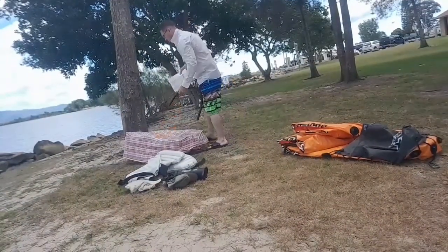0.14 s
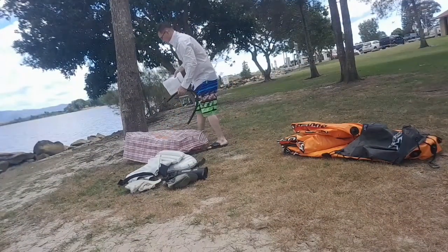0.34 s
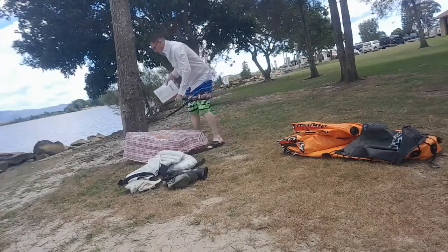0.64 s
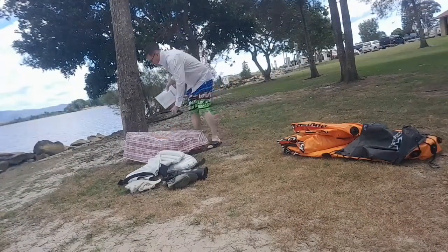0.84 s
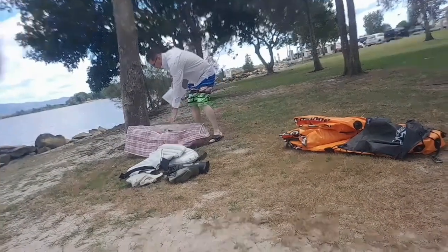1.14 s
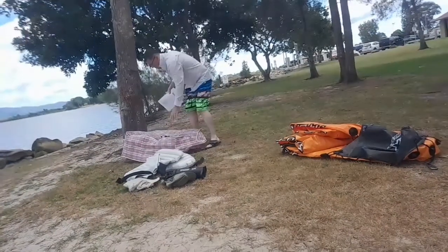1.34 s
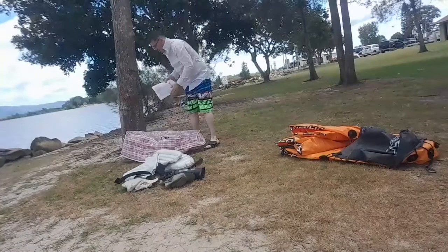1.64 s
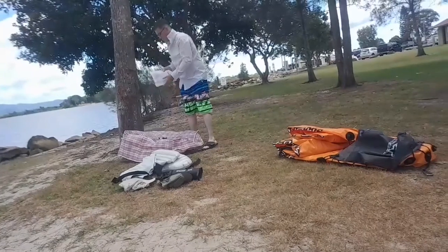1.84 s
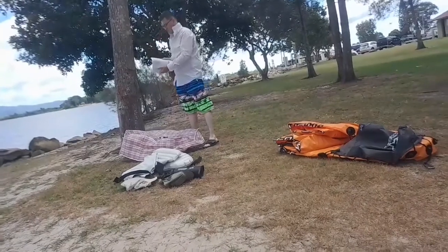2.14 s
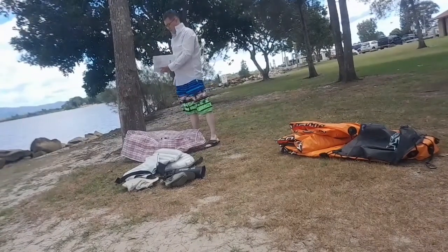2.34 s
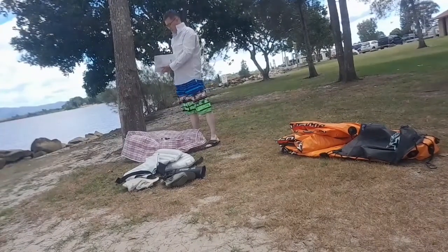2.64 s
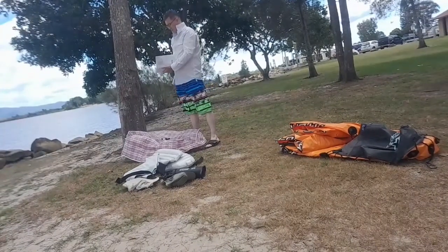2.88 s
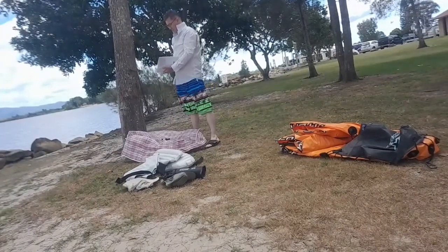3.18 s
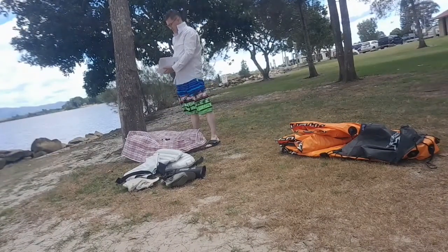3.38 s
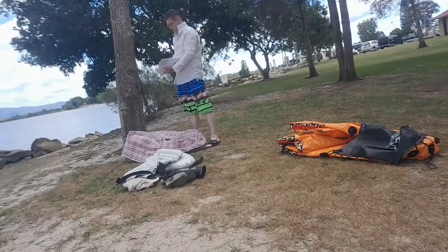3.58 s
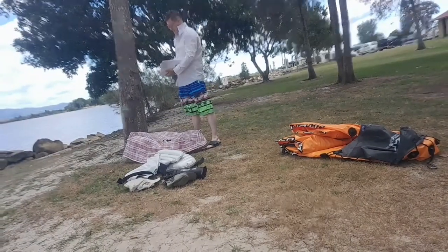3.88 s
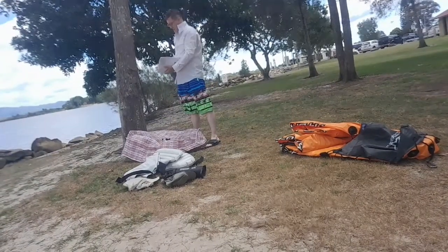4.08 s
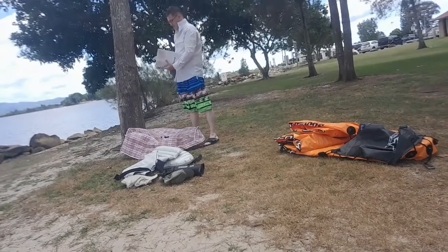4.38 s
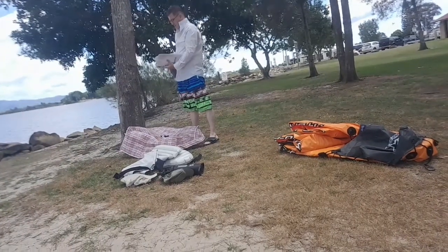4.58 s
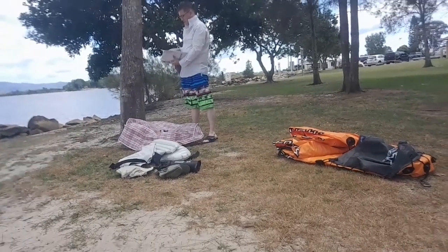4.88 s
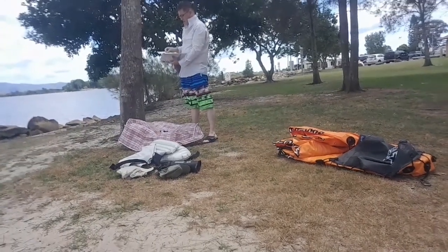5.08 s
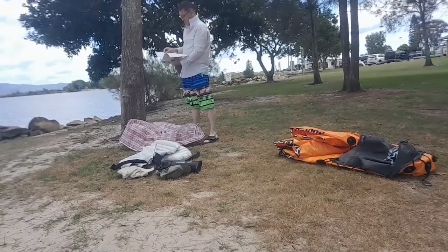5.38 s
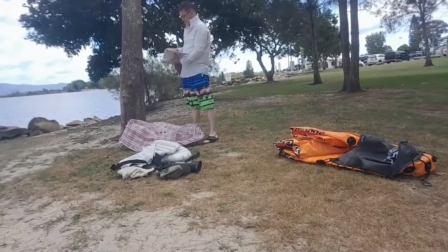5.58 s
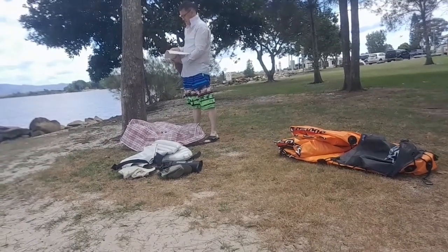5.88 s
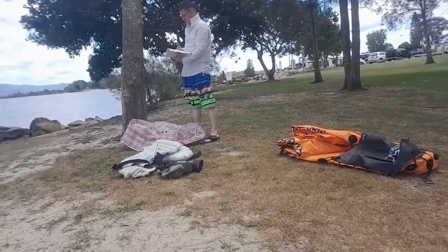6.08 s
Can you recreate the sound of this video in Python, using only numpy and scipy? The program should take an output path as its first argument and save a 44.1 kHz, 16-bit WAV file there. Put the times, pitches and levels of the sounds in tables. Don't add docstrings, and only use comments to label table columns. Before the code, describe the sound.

A quiet open-air park with faint breeze, distant traffic hum and slight microphone hiss. A bird at left gives very short upward whistles every half second or so, with soft echoes from trunks and leaves. From 0 to 1 s there are only weak rubs and tiny knocks. At 1.1 s a finger lands with a loud plastic knock and drags in a harsh, squeaky, ringing scrape, peaking with a low thump near 1.24 s and lifting off by 1.3 s. From 1.5 to 2.35 s come scattered dry ticks, taps and small knocks, sharpest at 1.8 s. It then calms, the bird clear, with faint dry rubbing around 3.7 s. A very loud, clipped knock hits at 3.91 s with rubbing after it, a heavy bump at 4.73 s, lighter taps from 5.05 s, and a hard snapping cluster at 5.53 to 5.65 s. Breeze and traffic, slightly stronger, close the scene.

```python
import sys
import numpy as np
from scipy import signal
from scipy.io import wavfile
from scipy.ndimage import uniform_filter1d

SR = 44100
rng = np.random.default_rng(int(sys.argv[2]) if len(sys.argv) > 2 else 0)


def generate_wav(signal):
    frames = np.transpose(np.atleast_2d(signal))
    scaled = np.clip(frames, -1, 1) * 32767
    pcm = np.round(scaled).astype(np.int16)
    wavfile.write(sys.argv[1], SR, pcm)


def gain_from_db(level_db):
    decades = np.asarray(level_db, float) / 20
    return 10 ** decades


N = 274417

# f/Hz, level/dB
SHELL_RINGS = [(230, -3.5), (430, -8.5), (600, -9.5), (700, -7.5), (900, -10), (1050, -4.5), (1300, -6.5)]


def evened(x):
    return x / np.sqrt(np.mean(x ** 2) + 1e-20)


def read(points, hz):
    f, value = np.transpose(points)
    return np.interp(np.log(hz + 1), np.log(f + 1), value)


def add(mix, s, sound):
    sound = sound[:, max(-round(s * SR), 0):]
    part = mix[:, max(round(s * SR), 0):][:, :sound.shape[1]]
    part += sound[:, :part.shape[1]]


def sides(db):
    return gain_from_db(db * np.array([[.5], [-.5]]))


def resonate(x, hz, width):
    r = np.exp(-np.pi * width / SR)
    return signal.lfilter([1 - r * r, 0, r * r - 1], [2, -4 * r * np.cos(2 * np.pi * hz / SR), 2 * r * r], x)


def sharp_resonate(x, hz, width):
    return resonate(resonate(x, hz, width), hz, width)


def band(x, low_hz, high_hz):
    return signal.sosfilt(signal.butter(3, [low_hz, high_hz], "bandpass", fs=SR, output="sos"), x)


def lowpass(x, hz):
    return signal.sosfilt(signal.butter(2, hz, fs=SR, output="sos"), x)


def noise(spectrum, size, patchy_db, flicker_db, same=None):
    # f/Hz, likeness (1 is identical)
    likeness = [(60, .85), (300, .8), (640, .75), (1400, .35), (3100, 0), (6800, .3), (11000, .85)]
    frames, hz = 4 * N // size + 5, np.fft.rfftfreq(size, 1 / SR)
    a, b, c, d, patches = rng.standard_normal((frames, len(hz), 5)).T
    flicker = evened(uniform_filter1d(patches[0], size=3))
    patches = uniform_filter1d(uniform_filter1d(patches, size=6, axis=0), size=8, axis=1)
    same = read(likeness, hz) if same is None else same + 0 * hz
    same = same[:, None]
    left, other = a + 1j * b, c + 1j * d
    z = np.array([left, same * left + np.sqrt(1 - same ** 2) * other])
    z *= gain_from_db(read(spectrum, hz)[:, None] + patchy_db * evened(patches) + flicker_db * flicker)
    return evened(signal.istft(z, nperseg=size, noverlap=3 * size // 4)[1][:, :N])


def around():
    # t/s, breeze/dB, far traffic/dB
    park = [(0, -47, -50), (0.2, -69, -61.5), (0.55, -62, -55), (0.7, -58, -59), (0.88, -61, -56),
            (1.299, -47.5, -66.5), (1.46, -63.5, -68), (1.9, -52, -66), (2.5, -61.5, -59),
            (2.7, -62, -57.5), (3.28, -57.5, -57.5), (3.45, -57, -61.5), (4.309, -59, -53.5),
            (4.621, -42.5, -49), (5.103, -48, -52), (5.45, -53, -48.5), (5.85, -52, -49.5),
            (6.22, -50.5, -48.5)]
    # start/s, hold/s, pressure/dB, dryness/dB (hiss against rub)
    strokes = [(0, 0.024, -50.5, -8), (0.07, 0.13, -62, -3.5), (0.423, 0.066, -58, -1.5),
               (0.67, 0.15, -58, -8), (1.075, 0.026, -43.5, -0.5), (1.32, 0.02, -55.5, -4),
               (1.493, 0.71, -62.5, -2.5), (1.575, 0.035, -47, -4), (1.829, 0.024, -49.5, -9),
               (1.976, 0.014, -54.5, -5.5), (2.24, 0.04, -45.5, -3.5), (2.3, 0.11, -58.5, -0.5),
               (2.61, 0.17, -64, -9), (3.015, 0.27, -63, 6.5), (3.599, 0.036, -56.5, 5),
               (3.641, 0.03, -52.5, 1.5), (3.704, 0.24, -46, 1), (3.922, 0.054, -34, -7),
               (4.008, 0.025, -43, -6.5), (4.07, 0.035, -38.5, -7.5), (4.147, 0.13, -45.5, -9),
               (4.226, 0.023, -46, -7.5), (4.42, 0.082, -70, 9.5), (4.74, 0.045, -35.5, -11.5),
               (4.792, 0.016, -39.5, -12.5), (4.864, 0.043, -58, 4), (5.061, 0.015, -44, -11),
               (5.139, 0.012, -37, -6), (5.268, 0.21, -59, -0.5), (5.525, 0.02, -39, -9.5),
               (5.563, 0.005, -42, -10.5), (5.584, .008, -29.5, -13), (5.585, 0.011, -32, -0.5),
               (5.615, 0.016, -43, -8), (5.644, 0.0072, -36, -6), (5.661, 0.018, -43, -7.5)]
    # f/Hz, density/dB
    breeze_colour = [(12, -68.5), (27, -35), (45, -2.5), (70, 3), (178, -11), (250, -20), (320, -44),
                     (550, -120)]
    hum_colour = [(110, -54), (180, -12.5), (334, -2.5), (478, -2), (617, -9), (900, -14), (1400, -20.5),
                  (2400, -71.5)]
    rub_colour = [(410, -45), (700, -20), (1140, -3.5), (1650, -14.5), (2450, -13), (3800, -21.5),
                  (4940, -42), (8360, -120)]
    hiss_colour = [(1900, -25), (3000, 0.5), (4800, 4), (5400, -1), (6900, 1.5), (8500, -5.5),
                   (10000, -5.5), (15900, -14.5)]
    self_colour = [(900, -24.5), (1500, 5), (2100, -4.5), (4000, -3), (6000, -3), (8000, -7.5),
                   (15900, -10), (16400, -30)]
    rise_db_per_s, fall_db_per_s = 899.5, 499.5
    rock_db, body_db = -0.5, -1
    tyre_db = -7

    t, t_coarse = np.arange(N) / SR, np.arange(0, N + 64, 64) / SR
    s, hold, db, dry_db = np.transpose(strokes)[:, :, None]
    press_db = db - rise_db_per_s * np.maximum(s - t_coarse, 0)
    press_db = press_db - fall_db_per_s * np.maximum(t_coarse - s - hold, 0)
    slide = np.interp(t, t_coarse, gain_from_db(2 * press_db).sum(0))
    rasp = np.interp(t, t_coarse, gain_from_db(2 * (press_db + dry_db)).sum(0))
    at, wind_db, road_db = np.transpose(park)
    wind = gain_from_db(2 * np.interp(t, at, wind_db))
    road = gain_from_db(2 * np.interp(t, at, road_db))

    breeze = noise(breeze_colour, size=2048, patchy_db=1.5, flicker_db=1, same=0.61)
    breeze *= gain_from_db(-1.0) * np.sqrt(wind + gain_from_db(2 * rock_db) * slide)
    hum = noise(hum_colour, size=1024, patchy_db=2.0, flicker_db=0)
    hum *= gain_from_db(-2.5) * np.sqrt(road + gain_from_db(2 * body_db) * slide)
    rub = noise(rub_colour, size=512, patchy_db=4.0, flicker_db=1)
    rub *= gain_from_db(-3.0) * np.sqrt(slide + gain_from_db(2 * tyre_db) * road)
    hiss = gain_from_db(-4.0) * np.sqrt(rasp) * noise(hiss_colour, size=256, patchy_db=4.5, flicker_db=1)
    slips = gain_from_db(4.0 * np.minimum(rng.exponential(size=N), 2)) * (rng.random(N) < 200 / SR)
    catches = evened(band(slips * rng.standard_normal((N, 2)).T, 2500, 15000))
    hiss += gain_from_db(-16.5) * np.sqrt(rasp) * catches
    own = gain_from_db(-66.5) * noise(self_colour, size=512, patchy_db=.6, flicker_db=0)
    return breeze + hum + rub + hiss + own


def bird():
    # t/s, level/dB, top pitch f/Hz
    chirps = [(-0.025, -62, 3100), (0.379, -51, 3860.0), (0.654, -59.5, 3040.0), (0.982, -52.5, 3860.0),
              (1.674, -54.5, 3790), (1.899, -62.5, 3520), (2.321, -52.5, 3840), (2.939, -53, 3796),
              (3.511, -53.5, 3730), (4.024, -46, 3930), (4.374, -59.5, 3350.0), (4.641, -46.5, 3898),
              (4.916, -62, 3980), (5.196, -50, 3795), (5.775, -49.5, 3610), (5.925, -57, 3530),
              (6.074, -64, 3750)]
    # t/s, share of top pitch
    glide = [(0, .57), (.011, .667), (.023, .77), (.036, .9), (.046, .975), (.053, 1.), (.06, .98),
             (.068, .92)]
    # f/Hz, level/dB
    beak = [(2000, -27.5), (3000, -14), (3800, -6.5), (4700, -8), (5800, -1.5), (7500, -8.5), (8800, -4.5),
            (13000, -11.5)]
    # t/s, level/dB, f/Hz, length/s
    peeps = [
        (.655, -61, 2950, .09),
        (.80, -60, 600, .08),
        (5.70, -64, 7700, .07),
        (5.82, -70, 4300, .1),
        (6.09, -66, 7300, .07),
    ]
    # f/Hz, t60/s
    trees = [(2000, 0.28), (5000, 0.52), (8000, 0.34)]
    # delay/s, level/dB
    trunks = [
        (.04, -12),
        (.062, -12),
        (0.094, -7),
    ]

    dry, t = np.zeros((1, N)), np.arange(0, glide[-1][0], 1 / SR)
    envelope = signal.windows.tukey(len(t), .35) * np.minimum(t / 0.022, 1) ** 2
    for s, db, top_hz in chirps:
        hz = top_hz * np.interp(t, *np.transpose(glide))
        rasp = uniform_filter1d(rng.standard_normal(len(t)), size=40)
        phase = 2 * np.pi * np.cumsum(hz * (1 + 0.12 * rasp)) / SR
        call = sum(gain_from_db(read(beak, k * hz) - 14 * (k > 2)) * np.sin(k * phase) for k in range(1, 4))
        add(dry, s, gain_from_db(db) * call[None] * envelope)
    for s, db, hz, length in peeps:
        held = np.arange(0, length, 1 / SR)
        wobble = uniform_filter1d(rng.standard_normal(len(held)), size=200)
        phase = 2 * np.pi * hz * np.cumsum(1 + 0.14 * wobble)[None] / SR
        add(dry, s, gain_from_db(db) * np.sin(phase) * np.hanning(len(held)))

    hz, late, z = signal.stft(rng.standard_normal((2, SR)), SR, nperseg=256)
    tail = signal.istft(z * gain_from_db(-60 * late / read(trees, hz)[:, None]), SR, nperseg=256)[1]
    echo = signal.fftconvolve(dry, tail / np.linalg.norm(tail[0]), axes=1)[:, :N]
    repeats = sum(gain_from_db(db) * np.roll(dry, round(s * SR)) for s, db in trunks)
    return dry * sides(25.5) * gain_from_db(-5.3) + repeats, gain_from_db(6) * sides(3) * echo


def waver(echo):
    return echo * evened(lowpass(rng.standard_normal((N, 2)).T, 70))


def thump(s, db, hz, t60, lead):
    t = np.arange(12000) / SR
    swing = gain_from_db(-60 * t / t60) * (1 - np.exp(-t * hz * 2.7))
    sag_turns, sag_rate = .4, 1.5
    turns = hz * t + sag_turns * (1 - np.exp(-t * hz * sag_rate))
    phase = 2 * np.pi * turns + np.array([[.5], [-.5]]) * lead
    return s, gain_from_db(db + 8.0) * swing / swing.max() * np.sin(phase)


def knock(s, db, hz, pan_db, chance):
    firm_t60_s, loosen = 0.02, 0.12
    bright_db_per_octave = 3.5
    t = np.arange(5000) / SR
    t60 = firm_t60_s * gain_from_db(-loosen * db)
    ring = 0
    for k, ((f, gain_db), (strong, shift, phase, lead)) in enumerate(zip([(hz, 0)] + SHELL_RINGS, chance)):
        other = k > 0
        gain_db = gain_db + other * 1.5 * strong + bright_db_per_octave * np.log2(f / hz)
        fade = gain_from_db(gain_db - 60 * t / t60 * (f / hz) ** 0.68)
        turn = 2 * np.pi * f * (1 + 0.068 * shift * other) * t + .5 * phase * other
        ring = ring + fade * np.sin(turn + 0.76 * lead * np.array([[1], [-1]]))
    ring = ring * (1 - np.exp(-t / 0.0014))
    return s, gain_from_db(db) * sides(pan_db) * ring / abs(ring).max()


def tick(s, db, hz, pan_db, chance):
    snap_rings = [1300, 2450, 3700, 4500, 6000, 6900, 9800, 13000]
    q, spread_db = 4.6, 5
    above_db_per_octave, below_db_per_octave = 9, 8.5
    t = np.arange(chance.shape[1]) / SR - .0012
    grains = chance * abs(chance)
    shape = np.exp(-abs(t) / 0.00017) + 0.26 * np.exp(-abs(t) / np.where(t < 0, .0012, .0028))
    burst = (grains[:2] + grains[2]) * shape
    burst[:, np.argmin(abs(t))] += 8.0
    colour = 0.11 * (hz / 6000) ** 2.7 * band(burst, 700, 20000) + resonate(burst, hz, hz / q)
    for f, strong in zip(snap_rings, chance[2, ::-1]):
        slope = above_db_per_octave if f > hz else below_db_per_octave
        gain_db = spread_db * np.clip(strong, -2, 1) - slope * abs(np.log2(f / hz)) - 2.5
        colour = colour + gain_from_db(gain_db) * resonate(burst, f, f / q)
    return s, gain_from_db(db + 3.5) * sides(pan_db) * colour / abs(colour).max()


def soften(s, sound, cut_db):
    dull = lowpass(sound, 4500)
    return s, dull + gain_from_db(-max(cut_db, 0)) * (sound - dull)


def scrape():
    # t/s, finger pressure/dB, slipperiness/dB (squeak against ring)
    drag = [
        (1.104, -24.5, -22),
        (1.143, -13, -4),
        (1.198, -17, -10),
        (1.201, -3.5, -15.5),
        (1.234, -0.5, -20.5),
        (1.242, -27, -6.5),
        (1.285, -44, 0),
        (1.306, -40, -1),
        (1.35, -75.5, 3),
    ]
    # f/Hz, width/Hz, level/dB
    drag_rings = [(564, 270, -4), (851, 100, -0.5), (1090, 300, 1.5), (1325, 170, -2.5)]
    # f/Hz, width/Hz, level/dB, until/s
    squeak_rings = [(2080, 1100, 0.5, 1.4), (2850, 590, -2, 1.4), (4270, 410, 4.5, 1.3),
                    (5440, 370, -10.5, 1.4)]
    # f/Hz, width/Hz, level/dB
    hiss_rings = [(8300, 570, -0.5), (9800, 530, 0.5), (11450, 980, -0.5), (14200, 1200, -8)]

    s, pressure_db, slip_db = np.transpose(drag)
    t = np.arange(s[0], s[-1], 1 / SR)
    ring_db = np.interp(t, s, pressure_db)
    squeak_db = ring_db + np.interp(t, s, slip_db)
    low_db, hiss_db = -13.5 + .45 * ring_db, squeak_db - 8.5

    clumps = gain_from_db(evened(uniform_filter1d(rng.standard_normal(len(t)), size=150)))
    hits = rng.random((len(t), 3)).T < 3000 * clumps / SR
    draws = rng.standard_normal((len(t), 3)).T * hits
    shared = np.array([np.roll(draws[0], shift=6), draws[0]])
    slips = draws[1:] * .5 + shared
    dusty = slips + 0.4 * rng.standard_normal((len(t), 2)).T

    low = evened(band(slips, 60, 270))
    hiss = evened(sum(gain_from_db(g) * sharp_resonate(dusty, f, w) for f, w, g in hiss_rings))
    ring = evened(sum(gain_from_db(g) * sharp_resonate(slips, f, w) for f, w, g in drag_rings))
    steady = np.sqrt(uniform_filter1d((ring ** 2).mean(0), size=250) + .25)
    ring = evened(ring / steady)
    squeak = evened(sum(gain_from_db(g - 750 * np.maximum(t - until, 0)) * sharp_resonate(dusty, f, w)
                        for f, w, g, until in squeak_rings))
    out = gain_from_db(low_db - 4.0) * low + gain_from_db(hiss_db + 1.0) * hiss
    out += gain_from_db(ring_db) * ring + gain_from_db(squeak_db + 1.5) * squeak
    return s[0], out * signal.windows.tukey(len(t), .05)


def lift():
    # (f/Hz, width/Hz, level/dB)
    lift_off = (1.288, 0.0418, [(850, 87, -40), (2710, 245, -44), (5600, 700, -50)])
    start, length, rings = lift_off
    rub = rng.standard_normal((round(length * SR), 2)).T
    squeal = sum(gain_from_db(db) * evened(sharp_resonate(rub, hz, w)) for hz, w, db in rings)
    return start, sides(9.5) * squeal * np.hanning(rub.shape[1])


def scene():
    # t/s, peak/dB, f/Hz,
    # t60/s, phase lead of left/rad
    thumps = [(0.0, -45, 48.7, 0.1, 0.71), (0.673, -53, 66.6, 0.14, 0.55), (1.097, -28, 89.4, 0.078, 1.4),
              (1.239, -5.5, 150.7, 0.038, 2.3), (1.247, -24, 42, 0.13, 1.2), (1.264, -10, 79.4, 0.089, 2.5),
              (1.501, -39.5, 89, 0.058, 1.53), (1.564, -49.5, 103.4, 0.28, 0.94),
              (1.812, -30.5, 93.3, 0.1, 1.93), (1.967, -29.5, 71, 0.078, 2.48),
              (2.258, -24, 70.5, 0.16, 2.77), (2.27, -24.5, 210, 0.037, 2.1),
              (3.695, -36.5, 108, 0.19, 2.07), (3.912, -19, 656, 0.029, 0.45),
              (3.918, -20, 230, 0.032, 2.57), (3.935, -18, 119, 0.14, 2.48), (3.969, -35, 85.5, 0.28, 1.8),
              (4.66, -40, 69.35, 0.32, 0.88), (4.729, -8.5, 193.6, 0.062, 2.6),
              (4.731, -10.5, 96.8, 0.1, 2.51), (4.735, -29, 45, 0.15, 1.2),
              (4.951, -42.5, 74.2, 0.17, 0.79), (5.522, -22.5, 49.3, 0.21, 2.94),
              (5.576, -35, 1122, 0.063, .5), (5.577, -40, 2610, 0.056, .5), (5.587, -22, 410, 0.052, 0.9),
              (5.643, -38, 2500, 0.032, .5), (5.652, -39.5, 1205, 0.082, 0.6), (5.646, -35, 76, 0.12, 3.8),
              (5.85, -44.5, 83, 0.047, 1.2), (5.888, -43.5, 63.5, 0.23, 1.3)]
    # t/s, peak/dB, loudest ring f/Hz, left-right/dB
    knocks = [(0.118, -41, 1170, -3), (0.345, -39, 360, 4), (1.0959, -1, 978, 2), (1.289, -34, 850, 20),
              (1.502, -32, 673, 9), (1.555, -30.5, 364, 0), (1.577, -23.5, 401, -2),
              (1.653, -24, 1340, 2.5), (1.79, -29.5, 1240, 5), (1.812, -14.5, 440, -4.5),
              (2.153, -31, 434, 5), (2.222, -30.5, 416, -4), (2.24, -25.5, 474, 6), (2.267, -30, 400, 12),
              (2.337, -26, 334, 5.5), (3.072, -36, 492, 0), (3.692, -34, 453, 0), (3.912, -1, 1047, 1.5),
              (3.9282, -15.5, 1150, 4), (3.969, -16, 637, 9), (4.632, -29.5, 416, 5.5),
              (4.7289, -10, 547, 13), (4.904, -37, 498, 15), (5.051, -16, 412, -3), (5.137, -20.5, 436, 0),
              (5.262, -31, 394, 3.5), (5.392, -25, 433, 3.5), (5.529, -15.5, 422, 4.5),
              (5.5863, -6, 1096, 1.5), (5.64, -26.5, 440, -3)]
    # t/s, peak/dB, brightest f/Hz, left-right/dB
    ticks = [(0.3458, -55.5, 2960, 28), (1.0669, -42, 3770, 5.5), (1.079, -25.5, 7530, 13.5),
             (1.3746, -44.5, 7780, 5.5), (1.498, -21, 6230, 3.5), (1.5035, -30, 5825, 4.5),
             (1.5548, -22, 4440, 2), (1.6187, -28.5, 13150, 5.5), (1.623, -25, 13120, -2),
             (1.6318, -37.5, 13390, 5), (1.667, -38, 5350, 6), (1.699, -38.5, 5930, 15.5),
             (1.7658, -39.5, 1500, 8), (1.8005, -7, 6130, 5), (1.8117, -9.5, 6245, -8),
             (1.8501, -31.5, 5600, -1.5), (1.95, -34.5, 3700, 11.5), (1.9697, -35, 7200, 9),
             (1.9979, -31.5, 6000, 12.5), (2.0618, -39, 6860, 8.5), (2.1085, -17.5, 4600, 12.5),
             (2.1518, -19.5, 4280, 11), (3.2125, -49, 5910, 24.5), (3.9294, -13, 3730, -0.5),
             (4.2924, -29, 12880, -1.5), (4.3816, -40.5, 6600, 14), (4.7283, -17.5, 3680, -1.5),
             (5.3909, -23, 5996, 3.5), (5.5859, -7.5, 6300, 0.5),
             (0.38, -48.5, 1310, 2), (.479, -46, 1300, -0.5), (.779, -48, 7000, 4),
                (1.123, -30, 4375, 0.5), (1.138, -23, 4290, 0), (1.146, -19, 4320, 1.5),
                (1.2014, -12, 3060, -2.5), (1.2215, -4, 4500, -0.5), (1.485, -41, 6000, 0),
                (1.545, -40, 9800, 0), (1.579, -28.5, 3720, 0.5), (1.604, -36.5, 4500, 0),
                (1.834, -39.5, 4500, 0), (1.857, -36, 13000, 0.5), (1.871, -41.5, 7000, 0),
                (3.69, -33, 2400, 0), (3.762, -45, 6900, 0), (3.770, -40, 9800, -0.5),
                (3.777, -39, 9800, 0), (3.785, -40, 9800, 0.5), (3.810, -38.5, 9800, 0),
                (3.821, -33, 9700, 0), (3.852, -40.5, 6900, 0.5), (3.884, -36, 9800, 0),
                (3.936, -26.5, 9800, -1), (3.953, -35.5, 6900, -1.5), (3.995, -33.5, 12900, 2.5),
                (4.148, -46, 9800, -0.5), (4.234, -38, 9800, -8), (4.301, -36, 13000, 0),
                (4.7266, -15.5, 1180, 0.5), (5.013, -47.5, 2400, 5.5), (5.073, -54, 4500, -1),
                (5.135, -37.5, 2400, -6), (5.147, -31, 6030, -2.5), (5.444, -41.5, 3400, 14),
                (5.498, -44, 6900, 1), (5.612, -30.5, 1300, -1), (5.647, -34.5, 2680, -2),
                (5.389, -29.5, 1330, 6), (1.929, -44.5, 9800, -0.5), (1.963, -41.5, 4500, -1),
                (1.984, -41, 6900, -1), (2.084, -40.5, 6860, 0), (2.19, -43.5, 9800, -1.5),
                (2.1087, -19, 12990, 6), (3.926, -27, 6000, -0.5), (3.9665, -25, 1700, 0.5),
                (2.329, -41.5, 8500, 0), (5.564, -26, 10300, 0), (5.565, -23, 1200, -1),
                (2.1522, -19, 7974, 6.5), (2.1523, -20.5, 13000, 4), (2.116, -37.5, 13000, 3),
                (2.097, -39.5, 2400, 1)]
    # t/s, peak/dB, left-right/dB, treble cut/dB
    taps = [(1.095, -6.5, -3.5, 3.5), (1.5602, -24.5, 1, 1.5), (1.5756, -20.5, 0.5, 1),
            (1.5884, -31.5, 3.5, 3), (1.6519, -16, 5, -0.5), (1.7886, -14.5, 5.5, 4),
            (1.8186, -17, 10.5, 8), (2.1696, -34.5, -1, 0.5), (2.2219, -30.5, -4, 3), (2.2403, -28.5, 7, 3),
            (2.268, -19.5, 10.5, 1), (2.3374, -27.5, 10.5, 1.5), (3.9726, -18.5, 16, 24.5),
            (3.9891, -30.5, 1, -0.5), (5.0481, -23, 1.5, 11.5), (5.062, -32, -5, 9.5), (5.1492, -31, 0, 8),
            (5.2635, -31, 14, 3), (5.5271, -11.5, 0, 3), (5.564, -20, -1, 1.5), (5.6438, -26.5, -5, 9.5)]

    mix = around()
    call, echo = bird()
    for row in thumps:
        add(mix, *thump(*row))
    for row in knocks:
        add(mix, *knock(*row, rng.standard_normal((len(SHELL_RINGS) + 1, 4))))
    for row in ticks:
        add(mix, *tick(*row, rng.standard_normal((3, 1500))))
    for s, db, pan_db, cut_db in taps:
        landing = tick(s, db, 2500, pan_db, rng.standard_normal((3, 1500)))
        add(mix, *soften(*landing, cut_db))
    add(mix, *scrape())
    add(mix, *lift())
    return mix + call + waver(echo)


def top_cut(x):
    return signal.sosfilt(signal.butter(12, 15950, fs=SR, output="sos"), x)


def record(dry):
    clipped = np.clip(dry, -.98, .98)
    return top_cut(clipped)


dry = scene()
out = record(dry)
generate_wav(out)
```